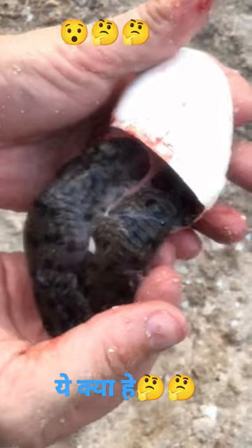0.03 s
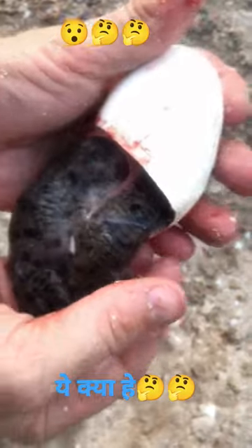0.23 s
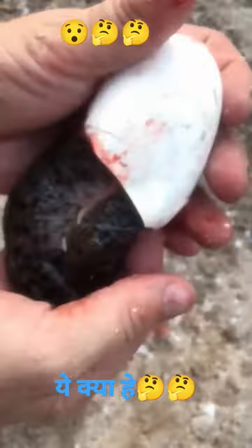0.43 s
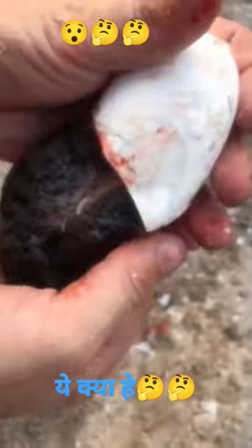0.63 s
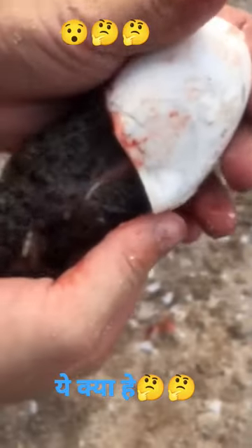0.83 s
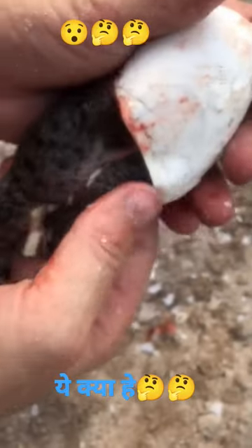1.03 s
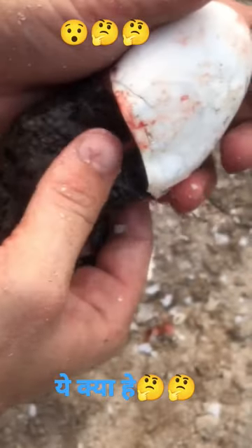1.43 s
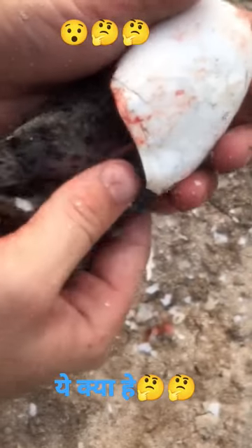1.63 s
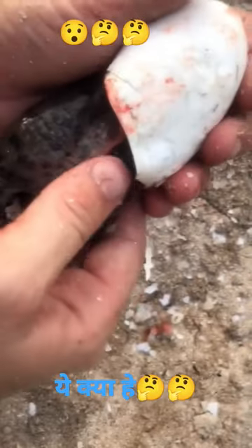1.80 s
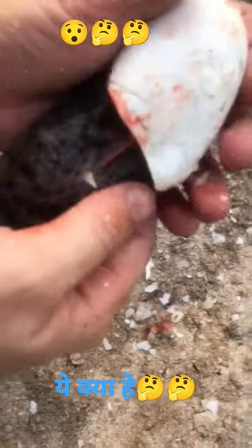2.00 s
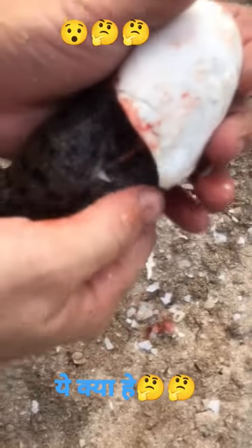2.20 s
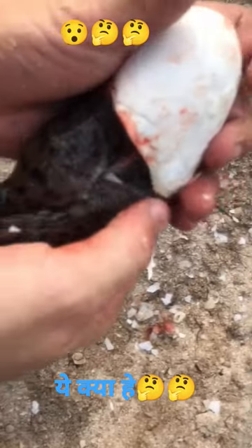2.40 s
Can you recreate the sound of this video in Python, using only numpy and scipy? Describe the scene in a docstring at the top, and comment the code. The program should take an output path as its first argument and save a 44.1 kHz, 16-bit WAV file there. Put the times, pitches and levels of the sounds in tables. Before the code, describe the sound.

Wet eggshell and membrane being peeled by hand, softly crinkling and clicking, after one dull bump.

```python
"""Muffled rubbing and one soft bump come first, over a low rumble and a faint mains-rate buzz.
Close to the microphone, hands are peeling a leathery egg shell off a wet hatchling.
The membrane crinkles, pops and squelches; the shell snaps in tiny clicks and its hollow rings near 660 Hz.
After 0.83 s the treble opens, and the rumble and buzz give way to thin hiss."""
import sys
import numpy as np
from scipy import signal
from scipy.fft import rfft, irfft
from scipy.io import wavfile
from scipy.ndimage import uniform_filter1d

SR = 44100
rng = np.random.default_rng(int(sys.argv[2]) if len(sys.argv) > 2 else 0)


def wav_out(sig):
    """Save sig, one row per channel (or a flat mono array), as 16-bit PCM at SR to the path in sys.argv[1]."""
    wavfile.write(sys.argv[1], SR, np.round(np.clip(np.atleast_2d(sig).T, -1, 1) * 32767).astype(np.int16))


N = 112454

# The shell breaking, close to the microphone. Each row: start in seconds, level in dB,
# centre in Hz, decay in ms, level of the hollow's ring in dB.
SHELL_SNAPS = [(0.127, -40, 3000, 0.37, -72), (0.5148, -49.5, 2400, 1.4, -82),
               (0.6484, -49.5, 2300, 1.1, -82), (.7315, -57, 2280, 0.86, -64),
               (0.869, -43, 2380, 1.2, -53.5), (0.9034, -47.5, 4200, 1.3, -77),
               (0.9647, -53, 5500, 0.87, -52), (1.0132, -42.5, 1880, 1.3, -37.5),
               (1.0298, -50, 9000, 2.1, -67), (1.0428, -52, 8900, 2.2, -60), (1.0620, -54, 8150, 1.7, -75),
               (1.279, -53.5, 6030, 1.3, -81), (1.3425, -47, 5340, 1.04, -64),
               (1.4483, -50, 2000, 1.5, -54.5), (1.5120, -51.5, 5600, 0.53, -74),
               (1.5575, -53, 4100, 1.3, -57), (1.5836, -51, 2420, 2.4, -46), (1.6548, -59, 6000, 1.2, -62),
               (1.6610, -47, 3300, 2.3, -41.5), (1.711, -49.5, 3650, 1.4, -73),
               (1.7230, -45.5, 3350, 1.6, -50.5), (1.7280, -53, 3200, 1.5, -63),
               (1.7524, -43.5, 6760, 0.76, -52.5), (1.7812, -43.5, 3620, 0.9, -55.5),
               (1.7913, -53, 3800, 0.86, -80), (1.8151, -47, 1530, 2, -74), (1.8445, -61, 1990, 1.3, -54),
               (1.8618, -35, 9700, 0.38, -54.5), (1.8990, -47, 4360, 1.3, -51.5),
               (1.9028, -44, 3900, 2.1, -53), (1.9356, -54.5, 5870, 1.9, -70),
               (1.9970, -51.5, 2390, 1.3, -65), (2.0082, -41.5, 1600, 1.2, -62),
               (2.1728, -48, 3230, 1.1, -82), (2.2264, -55.5, 4000, 1., -71),
               (2.2727, -47.5, 3900, 0.83, -68), (2.3349, -44.5, 9100, 0.86, -60),
               (2.4260, -41.5, 3520, 1.3, -56), (2.432, -38.5, 9500, 0.77, -65),
               (2.4356, -44.5, 4650, 1.1, -54.5), (2.4833, -48.5, 4260, 1.9, -80),
               (2.4859, -51, 4700, 1.8, -60), (2.4974, -39.5, 2830, 0.55, -56.5),
               (2.5215, -39, 2470, 0.59, -76), (2.5472, -43, 3470, 1.7, -57)]
def snaps(attack_ms=.11, width_share=.74, splinter_db=-4.5, flesh_db=-16.5):
    """Each snap is about a millisecond of tearing that rings a flake of shell and knocks the hollow."""
    cracks, hollow = np.zeros(N), np.zeros(N)
    ms = np.arange(2048) / SR * 1000
    tap = 1. * (ms == 0)
    air = steep_ring(tap, hz=659.4, width_hz=106)
    flesh = steep_ring(tap, hz=248, width_hz=248)  # dull push of the soft body underneath
    knock = air / air.max() + undb(flesh_db) * flesh / flesh.max()
    for start_s, db, hz, decay_ms, hollow_db in SHELL_SNAPS:
        envelope = (1 - np.exp(-ms / attack_ms)) * np.exp(-ms / decay_ms)
        tear = rng.standard_normal(len(ms)) * envelope
        flake = unit(steep_ring(tear, hz, hz * width_share))
        splinter = undb(splinter_db) * unit(ring(tear, hz, 3000 + hz))
        rms_over_peak = np.sqrt(np.mean(envelope ** 2)) / envelope.max()
        add(cracks, start_s, undb(db) * unit(flake + splinter) * rms_over_peak)
        add(hollow, start_s, undb(hollow_db) * knock)
    return cupped_hands(cracks) + hollow


def cupped_hands(cracks, db=-11, decay_ms=2.4):
    """The hands around the egg scatter each crack for a few milliseconds."""
    ms = np.arange(1024) / SR * 1000
    tail = rng.standard_normal(len(ms)) * (1 - np.exp(-ms)) * np.exp(-ms / decay_ms)
    return cracks + undb(db) * signal.fftconvolve(cracks, tail / np.linalg.norm(tail))[:N]


# The membrane's tone at close range. Each row: frequency in Hz, relative level in dB.
MEMBRANE_SPECTRUM = [(200, -56.5), (500, 6), (950, -1), (1200, -6.5), (1550, -0.5), (2200, -0.5),
                     (3100, 1.5), (4200, 0), (5500, -10), (9300, -3), (10400, -11), (12200, -6),
                     (13500, -5.5)]
# Its crinkling as the fingers pull. Each row: time in seconds, level in dB.
CRINKLE_LEVELS = [(0, -71), (.66, -68), (.78, -66), (.86, -56), (.92, -63.5), (1.0, -60), (1.10, -68),
                  (1.19, -66), (1.25, -68.5), (1.36, -67.5), (1.50, -69), (1.60, -62), (1.62, -60.5),
                  (1.665, -54), (1.695, -62.5), (1.765, -55), (1.835, -70.5), (1.895, -56), (1.925, -68.5),
                  (2.03, -76.5), (2.05, -64), (2.15, -71), (2.195, -64), (2.30, -65.5), (2.38, -63),
                  (2.42, -57.5), (2.445, -55.5), (2.46, -66), (2.49, -61.5), (2.55, -60.5)]
def crinkling(pop_db=-5):
    """The wet membrane crinkles and pops as it peels away."""
    fractures = unit(colour(grains(), MEMBRANE_SPECTRUM))
    return (fractures + undb(pop_db) * wet_pops()) * curve(CRINKLE_LEVELS)


def grains(per_s=5000, spread_db=4, slip_db=3.5):
    """Dense micro-fractures of very unequal size, bunched by stick and slip."""
    hits = rng.random(N) < per_s / SR
    sizes = undb(spread_db * np.minimum(rng.exponential(size=N), 4))
    signs = rng.choice([-1, 1], N)
    return hits * sizes * signs * undb(slip_db * waver(per_s=99))


def wet_pops(per_s=800, low_hz=1600, high_hz=6500, decay_cycles=3.5, spread_db=4):
    """Tiny films of moisture part, each ringing for a few cycles at its own pitch."""
    out, t = np.zeros(N), np.arange(1024) / SR
    draws = rng.random((4000, 3))
    for when, pitch, size in draws[:int(per_s * N / SR)]:
        cycles = t * low_hz * (high_hz / low_hz) ** pitch
        gain = undb(-spread_db * np.log(max(size, .03)))
        add(out, when * N / SR, gain * np.sin(2 * np.pi * cycles) * np.exp(-cycles / decay_cycles))
    return unit(out)


# Rubbing on the shell, close up. Each row: time in seconds, level in dB.
RUB_LEVELS = [(0, -57.5), (.12, -107), (.18, -53.5), (.24, -95), (.295, -55.5), (.33, -68), (.62, -76.5),
              (.74, -63), (.82, -71), (.87, -61.5), (.92, -68.5), (.97, -71.5), (1.11, -74), (1.2, -59),
              (1.25, -87), (1.40, -75), (1.47, -63.5), (1.51, -85), (1.63, -57.5), (1.70, -65),
              (1.775, -59), (1.815, -94), (1.893, -52), (1.93, -77.5), (2.12, -74), (2.21, -71),
              (2.29, -80), (2.39, -61), (2.44, -62.5), (2.465, -66.5), (2.5, -60), (2.55, -68.5)]
def rubbing():
    """Stick and slip sounds the hollow of the shell."""
    return unit(steep_ring(grains(), hz=660, width_hz=106)) * curve(RUB_LEVELS)


# Wet slides between the fingers. Each row: start in seconds, length in seconds,
# level in dB, centre in Hz, width in Hz.
MEMBRANE_SLIDES = [(0.131, .045, -65, 3070, 2200), (0.453, 0.022, -59, 3100, 2500),
                   (0.822, 0.028, -79, 3670, 4550), (0.988, 0.02, -67, 4020, 3000),
                   (1.607, 0.022, -56, 3320, 2980), (1.625, 0.033, -57.5, 3200, 3500),
                   (2.041, 0.016, -64, 3400, 3500), (2.185, 0.039, -63, 3100, 3500),
                   (2.368, 0.046, -60.5, 1870, 1400), (0.879, 0.027, -57.5, 3400, 3500),
                   (2.462, 0.048, -56.5, 4600, 2750)]
def squelches():
    """The membrane slides briefly: dense grains in one broad resonance."""
    out = np.zeros(N)
    for start_s, length_s, db, hz, width_hz in MEMBRANE_SLIDES:
        envelope = np.sqrt(np.abs(arch(length_s)))
        slide = unit(steep_ring(grains(), hz, width_hz))[:len(envelope)]
        add(out, start_s, undb(db) * envelope * slide)
    return out


# The modes of the knocked shell. Each row: frequency in Hz, relative level in dB, decay in ms.
SHELL_MODES = [(415, -13, 1.1), (1010, -6, 2.8), (1400, -5, 0.38), (2300, 0.5, 0.57), (3110, -9.5, 2.3)]
# Knocks just in front of the microphone. Each row: start in seconds, level in dB.
FINGER_KNOCKS = [(0.2471, -37.5), (0.2565, -41), (0.8006, -36.5), (0.811, -50)]
def knocks():
    """The shell strikes the fingers with a woody tick, its body near 1 kHz."""
    out, t = np.zeros(N), np.arange(2048) / SR
    body = sum(undb(db) * np.sin(2 * np.pi * hz * t) * np.exp(-1000 * t / decay_ms)
               for hz, db, decay_ms in SHELL_MODES)
    for start_s, db in FINGER_KNOCKS:
        add(out, start_s, undb(db) * body)
    return out


# Bumps near the microphone, the first by far the loudest. Each row: start in seconds,
# level in dB, starting pitch in Hz, decay in ms.
HAND_BUMPS = [(0.2186, -17.5, 326, 12), (.588, -41.5, 100, 22), (0.687, -46, 102, 26),
              (0.823, -40, 132, 13.6), (1.0787, -29.5, 620, 2.6)]
def bumps(rise_ms=3.06, period_growth=.82):
    """The hand lands with a dull thud whose pitch sinks as it dies away."""
    out, t = np.zeros(N), np.arange(SR // 5) / SR
    ms = t * 1000
    for start_s, db, hz, decay_ms in HAND_BUMPS:
        period_s = 1 / hz + period_growth * t
        cycles = np.cumsum(1 / period_s) / SR
        envelope = (1 - np.exp(-ms / rise_ms)) * np.exp(-ms / decay_ms)
        add(out, start_s, -undb(db) * np.sin(2 * np.pi * cycles) * envelope)
    return out


# Faint tones just after the first bump. Each row: start in seconds, length in seconds,
# level in dB, starting pitch in Hz, final pitch in Hz.
FALLING_TONES = [(0.263, .08, -61.5, 477, 219), (0.276, 0.038, -55.5, 776, 660)]
def glides():
    """Soft tones swell and fade as they fall."""
    out = np.zeros(N)
    for start_s, length_s, db, start_hz, end_hz in FALLING_TONES:
        envelope = arch(length_s)
        cycles = np.cumsum(np.geomspace(start_hz, end_hz, len(envelope))) / SR
        add(out, start_s, undb(db) * envelope * np.sin(2 * np.pi * cycles))
    return out


def handling(db=-73.5, waver_db=5.5):
    """Hands moving near the microphone make a patchy low rumble."""
    rumble = steep_ring(rng.standard_normal(N), hz=61.3, width_hz=54)
    return undb(db) * unit(rumble * undb(waver_db * waver(per_s=16)))


def buzz(mains_hz=60, jitter_s=.0009, db=-65):
    """Faint, slightly uneven electrical ticks at the mains rate."""
    times_s = np.arange(.0152, N / SR, 1 / mains_hz)
    times_s += jitter_s * rng.standard_normal(len(times_s))
    ticks = np.zeros(N)
    ticks[np.clip(times_s * SR, 0, N - 1).astype(int)] = 1
    return undb(db) * unit(steep_ring(ticks, hz=2380, width_hz=690))


# Behind the hands, first rumble and then hiss. Each row: frequency in Hz, relative level in dB.
RUMBLE_SPECTRUM = [(20, -23), (45, 5), (80, -5), (130, -11), (220, -18), (400, -21), (900, -25),
                   (1400, -32.5), (2400, -23.5), (3100, -28), (4000, -24), (13000, -33.5)]
HISS_SPECTRUM = [(20, -11.5), (55, -3), (100, -8.5), (170, -10), (350, -10.5), (700, -15.5), (1100, -20),
                 (1700, -23.5), (3000, -36), (5500, -27.5), (9300, -29), (10400, -25.5), (13000, -40.5)]
def background(spectrum, db, waver_db):
    """A bed of noise whose level wavers gently."""
    return undb(db + waver_db * waver(per_s=14)) * unit(colour(rng.standard_normal(N), spectrum))


def undb(db):
    """Decibels to gain."""
    return 10 ** (np.asarray(db) / 20)


def unit(x):
    """Scale to rms 1."""
    return x / np.sqrt(np.mean(x ** 2))


def curve(rows):
    """Gain along rows of time in seconds and level in dB."""
    return undb(np.interp(np.arange(N) / SR, *np.array(rows).T))


def colour(x, spectrum, size=8192):
    """Minimum-phase filter through rows of frequency in Hz and level in dB."""
    hz, db = np.array(spectrum).T
    bins_hz = np.maximum(np.arange(size // 2 + 1) * SR / size, 1)
    gains = undb(np.interp(np.log(bins_hz), np.log(hz), db))
    cepstrum = irfft(np.log(gains))
    cepstrum[1:size // 2] *= 2  # folding makes the filter causal
    cepstrum[size // 2 + 1:] = 0
    return signal.fftconvolve(x, irfft(np.exp(rfft(cepstrum))))[:len(x)]


def ring(x, hz, width_hz):
    """One resonance, gain 1 at its centre."""
    return signal.lfilter(*signal.iirpeak(hz, hz / min(width_hz, SR / 4), fs=SR), x)


def steep_ring(x, hz, width_hz):
    """A resonance applied twice: soft onset, dark skirts."""
    return ring(ring(x, hz, width_hz), hz, width_hz)


def waver(per_s):
    """Smooth random drift with a spread near 1."""
    hold = int(SR / per_s)
    steps = rng.standard_normal(N)[:N // hold + 1]
    return uniform_filter1d(np.repeat(steps, hold), hold)[:N]


def arch(length_s):
    """Rounded rise and fall."""
    return np.sin(np.linspace(0, np.pi, int(length_s * SR)))


def add(out, start_s, sound):
    """Mix a sound in at its time."""
    i = int(start_s * SR)
    out[i:i + len(sound)] += sound[:N - i]


def scene(opens_s=.83, muffle_hz=3400, treble_leak_db=-10.5):
    """One close microphone: the peeling is muffled and buzzy at first, then bright over hiss."""
    egg = crinkling() + rubbing() + squelches() + snaps() + knocks() + bumps() + glides() + handling()
    early = egg + background(RUMBLE_SPECTRUM, db=-58, waver_db=1.3)
    dull = signal.sosfiltfilt(signal.butter(6, muffle_hz, fs=SR, output="sos"), early)
    muffled = dull + undb(treble_leak_db) * (early - dull) + buzz()
    bright = egg + background(HISS_SPECTRUM, db=-69.5, waver_db=1.4)
    opened = uniform_filter1d(1. * (np.arange(N) / SR > opens_s), size=256)
    return (muffled * (1 - opened) + bright * opened)[None]


def record(dry):
    """The recorder cuts the deepest bass and the top."""
    low_cut = signal.butter(3, 28.7, "high", fs=SR, output="sos")
    high_cut = signal.ellip(9, .2, 60, 13200, fs=SR, output="sos")
    return signal.sosfilt(high_cut, signal.sosfiltfilt(low_cut, dry, padtype="even"))


dry = scene()
out = record(dry)
wav_out(out)
```